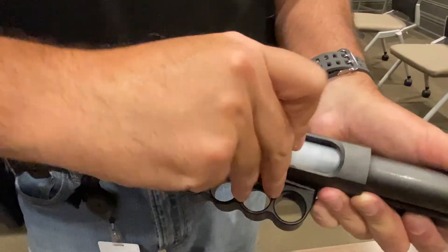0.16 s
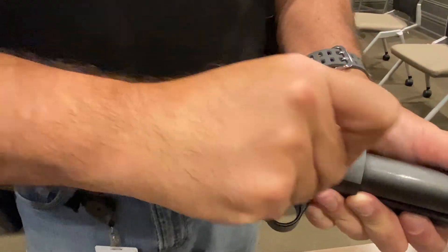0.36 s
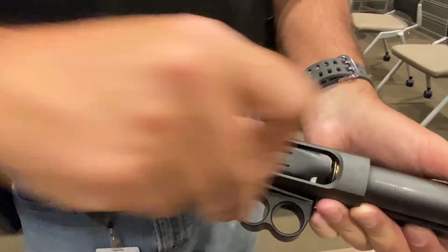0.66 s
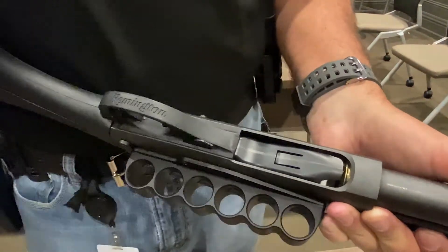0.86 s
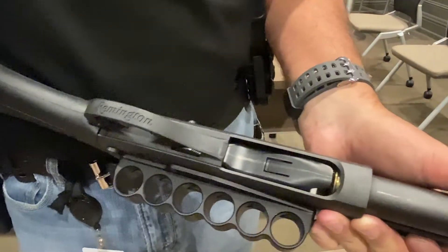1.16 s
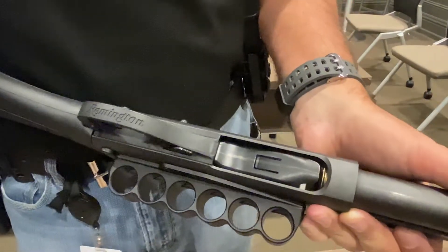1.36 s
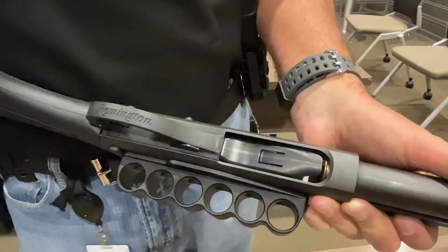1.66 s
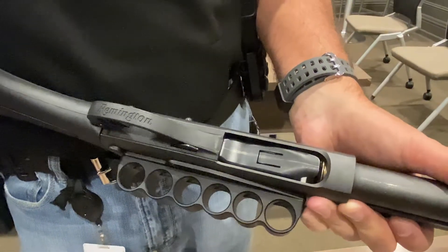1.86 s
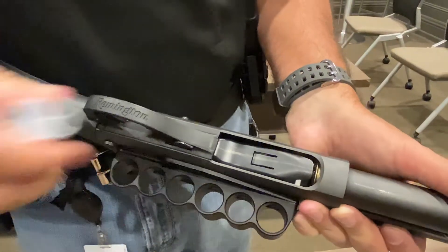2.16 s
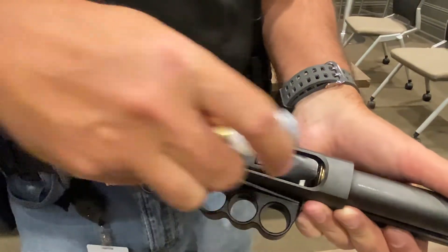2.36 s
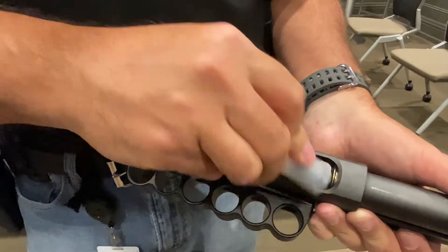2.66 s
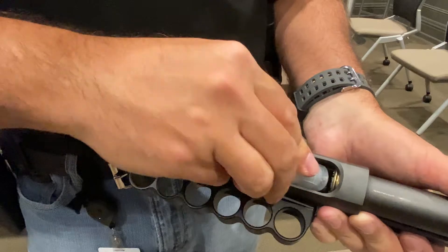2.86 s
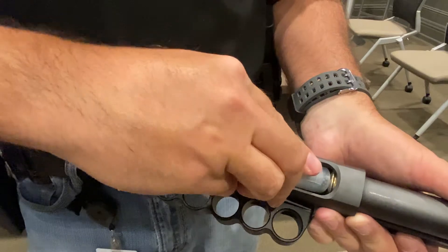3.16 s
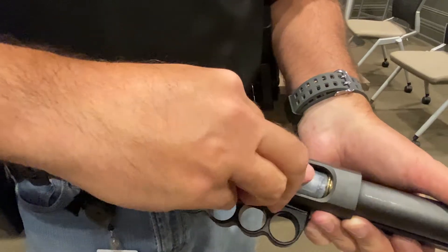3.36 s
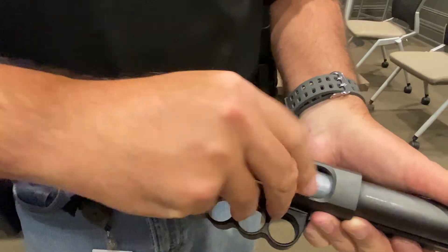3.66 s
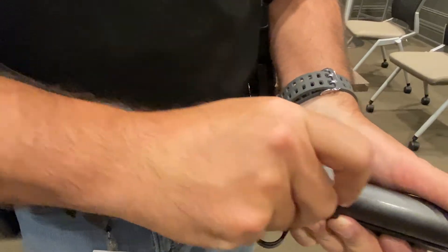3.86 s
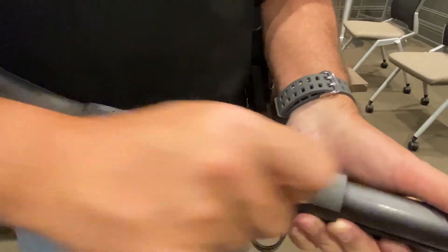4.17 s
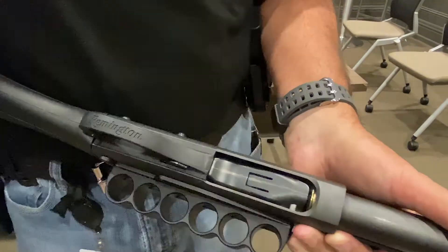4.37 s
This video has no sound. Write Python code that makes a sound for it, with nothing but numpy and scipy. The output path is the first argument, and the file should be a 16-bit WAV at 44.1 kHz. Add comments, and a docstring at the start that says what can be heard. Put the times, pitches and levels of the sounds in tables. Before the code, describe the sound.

Two plastic training shells are pushed into a pump shotgun with sharp metallic clicks, scrapes and snaps, close up in a classroom.

```python
"""Loading a pump shotgun

Two plastic training shells are thumbed into the magazine tube, close to the microphone.
Each slaps the lifter down, scrapes forward, trips the latch and snaps home; the lifter drops shut.
Each blow is a burst of chatter through the resonances of the struck part. Hands rub and knock
on the gun. A ventilated classroom throws every click back."""
import sys
import numpy as np
from scipy import signal
from scipy.fft import rfft, irfft, next_fast_len
from scipy.io import wavfile
from scipy.ndimage import uniform_filter1d, minimum_filter1d

SR = 44100
rng = np.random.default_rng(int(sys.argv[2]) if len(sys.argv) > 2 else 0)


def materialize(psi):
    """Save the field psi as 16-bit PCM at rate SR to the path in sys.argv[1].

    A 1-D psi becomes a single channel; in a 2-D psi each row is a channel.
    """
    bounded = np.clip(np.atleast_2d(psi).T, -1, 1)
    quanta = np.round(bounded * 32767).astype(np.int16)
    wavfile.write(sys.argv[1], SR, quanta)


N = 198846
LEAD = SR // 10  # samples before time zero
TOTAL = N + LEAD

# Background spectra: freq_hz, gain_db
VENT_COLOUR = [(15, -38.5), (25, -14), (110, -11), (145, -9.5), (235, -7), (325, -12), (362, -3.5),
               (393, -15), (515, -15), (772, -19.5), (1010, -19.5), (1600, -29), (2210, -29), (3060, -30),
               (15900, -35)]
HISS_COLOUR = [(18, -29), (30, 7), (59, -1.5), (292, -7), (379, -13.5), (432, -2.5), (852, -11.5),
               (11900, -8.5), (15500, -4.5)]
# Ventilation tones: pitch_hz, level_db
VENT_TONES = [(59, -70.5), (119, -64.5), (241, -66), (360.5, -60), (10056, -74.5), (15283, -75)]
# Room decay: freq_hz, t60_s
ROOM_DECAY = [(150, 0.23), (600, 0.44), (1700, 0.61), (4200, 0.68), (8000, 0.49), (14000, 0.41)]
# Room tail spectrum: freq_hz, gain_db
TAIL_COLOUR = [(150, 3), (600, 3), (1700, -1), (3300, -2), (4200, -4.5), (5600, -2), (8000, 0), (14000, -8)]
# Echoes off body, floor and walls: delay_s, gain_db
ROOM_ECHOES = [(.0058, -9.5), (0.0124, -11), (0.018, -20.5), (0.0383, -16), (0.049, -23), (0.0774, -20)]

# Hand strokes: start_s, length_s, level_db, hollow_share
HAND_RUBS = [(1.606, 0.062, -44, 0.92), (4.227, 0.024, -46.5, 0), (4.246, 0.047, -39, 0.11)]
# Shell pushes along lifter and tube: start_s, length_s, level_db, bright_share
SHELL_SCRAPES = [(.515, 0.065, -39, 0), (.595, 0.13, -36, 0.45), (0.803, .035, -33, 1),
                 (3.089, 0.06, -40, .1), (3.121, 0.071, -35.5, 0.2), (3.197, 0.03, -28.5, 0.68),
                 (3.238, 0.029, -34, 0.5)]

# Blows: start_s, level_db (over 10 ms), chatter_t60_s, tilt_db_per_oct, contact_hz, boost_db
HAND_KNOCKS = [(2.066, -43, 0.086, -6, 860, 6.2), (2.3457, -45.5, 0.1, 1, 2590, 6.4),
               (2.3791, -41.5, 0.036, 0.5, 2600, 6.5), (2.4684, -37.5, 0.11, 2.5, 510, 16),
               (3.770, -35, 0.035, -0.5, 800, 11.6), (4.348, -52, 0.041, -15, 454, 4)]
GUN_THUDS = [(3.479, -27.5, 0.052, 0.5, 335, 10.3), (3.546, -39, 0.051, -1, 270, 33)]
LIFTER_SHUTS = [(1.0270, -32, 0.039, 1.6, 3400, 4.3), (1.040, -38, 0.013, 0.5, 940, 7.5),
                (3.7583, -37.5, 0.0067, -2.9, 2630, 11)]
PORT_TAPS = [(-.02, -17.5, 0.071, 0.52, 6640, 3.4), (2.5537, -30, 0.014, 0.98, 2290, 6.8),
             (3.1134, -33.5, 0.018, 0.15, 6050, 10)]
LATCH_TRIPS = [(.5955, -24, 0.0098, 0.81, 11900, 5), (.6020, -35.5, 0.012, 0.075, 11700, 7.1),
               (3.1345, -24.5, 0.086, -0.44, 14200, 27.5)]
LIFTER_SLAPS = [(0.333, -12, 0.0056, 0.2, 9700, 5.5), (2.7424, -7.5, 0.0063, 0.3, 4020, 1.5)]
# Shell snaps home: blow columns, touch_lead_s
TUBE_SNAPS = [(0.7734, -18, .03, 0.82, 1375, 10.6, 0.001444), (3.2790, -18, 0.082, 0.5, 1350, 11.3, 0.0088),
              (3.4771, -19.5, 0.034, .43, 4300, 4.5, .0117)]
# Shell catches in the tube: start_s, level_db (over 10 ms), chatter_t60_s, tilt_db_per_oct
TUBE_CATCHES = [(.536, -41.5, .02, -1), (0.7274, -28, .025, 1), (.741, -28, 0.06, -0.5),
                (0.9586, -42.5, 0.057, -5.5), (3.5152, -26.5, 0.072, -1.2)]
# Light contacts around a blow: chatter_t60_s, tilt_db_per_oct, contact_hz, boost_db
SNAP_TOUCH = (0.04, -0.6, 3300, 8)
SLAP_TOUCH = (0.17, -0.8, 2603.5, 10)
REBOUND = (0.027, 0.51, 6500, 8.2)

# Broad spectra of rubbed and struck parts: freq_hz, gain_db
SKIN_COLOUR = [(120, -27.5), (200, -8), (450, -3.5), (600, 0), (750, -8), (1000, -0.5), (1200, -10),
               (1700, -14.5), (2600, -30), (3600, -23), (9000, -44)]
GRIT_COLOUR = [(200, -21), (600, -13.5), (1000, -11.5), (1700, -12.5), (2600, -6.5), (4000, 2), (5900, 6),
               (7000, 2.5), (9000, -2.5), (12500, 2), (16000, -12)]
HULL_COLOUR = [(500, 8), (2000, 10.5), (6000, -4.5), (9000, -11), (15000, -42)]
RECEIVER_COLOUR = [(100, -9), (250, -11.5), (500, -5.5), (900, 2.5), (1500, -4), (2600, -8), (4200, -9.5),
                   (7000, -21), (15000, -30)]
GUN_COLOUR = [(60, -36), (130, -14), (220, -3), (320, 2.5), (420, -8.5), (600, -14), (1000, -2.5),
              (2000, -6.5), (6000, -22.5)]
SHUT_COLOUR = [(88, -22), (150, -12), (588, -6.5), (757, -2.5), (1390, -6.5), (2050, 1), (2850, -8.5),
               (3470, -6.5), (4210, -7.5), (5430, -12.5), (15900, -35)]
PORT_COLOUR = [(88, -45.5), (150, -16), (340, -19.5), (493, -23), (743, -6), (1330, -14), (1820, -10),
               (3540, -4.5), (4130, -5.5), (4740, -5.5), (5540, -2), (15900, -26)]
TRIP_COLOUR = [(88, -53.5), (150, -44), (347, -5), (414, -16), (757, 2.5), (1210, -11), (1310, -0.5),
               (1790, -8.5), (5430, 1), (10100, -2.5), (11200, -3.5), (15900, -20.5)]
MAGAZINE_COLOUR = [(88, -46), (150, -6), (321, -12), (465, -3.5), (743, -7.5), (1060, -9.5), (1310, -7),
                   (1720, -2), (3540, 3), (4650, 4.5), (5760, 2), (12100, -8), (15900, -12)]
LIFTER_BOLT_COLOUR = [(88, -70), (150, -42), (414, -19), (503, -10), (903, -12), (1390, -11), (1970, -3),
                      (2590, -5.5), (2910, -7), (3820, 5), (4930, 0.5), (7720, -1), (15900, -19)]

# Part resonances (negative: notch): centre_hz, width_hz, height_db
HOLLOW_MODES = [(750, 38, 21.5)]
RECEIVER_MODES = [(324, 25, 14), (746, 20, 10), (1280, 140, 6), (2300, 720, 2.6)]
GUN_MODES = [(757, 110, 14.7)]
SHUT_MODES = [(840, 87, 2.3), (1910, 300, 3.7), (2150, 100, 7.2), (3390, 270, 6.9), (4040, 230, 7.6),
              (5530, 370, 6.9)]
PORT_MODES = [(1825, 126, 9), (2450, 340, 6), (4180, 310, 10), (5490, 160, 9), (6700, 64, 5),
              (8550, 170, 4.5), (9450, 240, 3), (15100, 600, 9.5), (4780, 310, -1.5)]
TRIP_MODES = [(780, 480, 6), (2450, 180, 10.5), (4280, 210, 12), (5550, 300, 8), (11100, 140, 15.5),
              (15350, 200, 16), (13200, 1200, -7.5), (10300, 760, -6)]
MAGAZINE_MODES = [(826, 320, 6.5), (1468, 14, 9), (2436, 53, 8), (2660, 46, 6.5), (3450, 86, 5),
                  (4043, 74, 6.5), (5360, 210, 6), (5850, 150, 6), (6470, 120, 4), (8130, 110, 4),
                  (9840, 100, 7), (11600, 200, 6), (13400, 360, 6), (1660, 180, -5), (4450, 180, 2.5)]
LIFTER_BOLT_MODES = [(850, 280, 5.5), (1910, 380, 3), (2863, 144, 12), (3250, 260, 5), (3790, 134, 2),
                     (4100, 160, 3.5), (4250, 260, 5.5), (4490, 94, 1), (5600, 100, 1), (7640, 190, 3),
                     (8200, 210, 4), (10700, 760, 9), (12850, 380, 8.5), (15400, 600, 9.5), (4950, 170, -3),
                     (11550, 340, -4), (14000, 800, 1.5)]


def amp(db):
    """dB to gain."""
    return 10 ** (np.asarray(db) / 20)


def unit(x):
    """Scale to rms 1."""
    return x / np.sqrt(np.mean(x ** 2) + 1e-20)


def read(points, hz):
    """Interpolate a table over log frequency."""
    freq_hz, value = np.transpose(points)
    return np.interp(np.log(hz + 1), np.log(freq_hz + 1), value)


def add(mix, start_s, sound):
    """Mix into a buffer that begins LEAD samples early."""
    part = mix[max(0, round(start_s * SR) + LEAD):][:len(sound)]
    part += sound[:len(part)]


def shaped(x, colour):
    """Zero-phase filter by a dB spectrum."""
    size = next_fast_len(len(x))
    gain = amp(read(colour, np.fft.rfftfreq(size, 1 / SR)))
    return irfft(rfft(x, size) * gain, size)[:len(x)]


def body(colour, modes, tilt_db_per_oct=0, size=4096):
    """Minimum-phase response of a part: broad colour plus resonances."""
    hz = abs(np.fft.fftfreq(size, 1 / SR))
    db = np.maximum(read(colour, hz), -60) + tilt_db_per_oct * np.log2(np.maximum(hz, 300) / 3000)
    for centre_hz, width_hz, height_db in modes:
        bell = 1 / (1 + (2 * (hz - centre_hz) / width_hz) ** 2)
        db += np.sign(height_db) * 10 * np.log10(1 + (amp(abs(height_db)) ** 2 - 1) * bell)
    log_spectrum = np.conj(signal.hilbert(np.log(amp(db))))
    return np.fft.ifft(np.exp(log_spectrum)).real[:size // 2]


def chatter(t60_s, rise_s=0.00035, size=8192, whitening_passes=6):
    """Contact force: a dying flurry of tiny collisions, flat in spectrum."""
    t = np.arange(size) / SR
    force = rng.standard_normal(size) * (1 - np.exp(-t / rise_s)) * amp(-60 * t / t60_s)
    for _ in range(whitening_passes):
        phase = np.angle(rfft(force))
        force = irfft(np.exp(1j * phase)) * (t < t60_s)
    return force


def blows(rows, colour, modes, contact_q=7.8, max_width_hz=330, level_window_s=0.01):
    """Chatter rings one part; the point of contact favours one pitch."""
    out = np.zeros(TOTAL)
    for start_s, level_db, t60_s, tilt_db_per_oct, contact_hz, boost_db in rows:
        contact = (contact_hz, min(contact_hz / contact_q, max_width_hz), boost_db)
        click = signal.fftconvolve(chatter(t60_s), body(colour, [*modes, contact], tilt_db_per_oct))
        click *= np.sqrt(SR * level_window_s) / np.linalg.norm(click)
        add(out, start_s, amp(level_db) * click)
    return out


def friction(size, slips_per_s, spread_db):
    """Random tiny slips of uneven strength."""
    strength = amp(spread_db * np.minimum(rng.exponential(1, size), 4))
    return strength * rng.standard_normal(size) * (rng.random(size) < slips_per_s / SR)


def stroke(length_s, attack_s, release_s, sag_db_per_s):
    """Sliding pressure: grip, ease, let go."""
    t = np.arange(0, length_s + release_s, 1 / SR)
    grip = np.minimum(t / attack_s, 1)
    release = np.clip(1 - (t - length_s) / release_s, 0, 1)
    return grip * amp(-sag_db_per_s * t) * release


def hiss(level_db=-63):
    """Microphone hiss and air that differ between the ears."""
    return amp(level_db) * unit(shaped(rng.standard_normal(N), HISS_COLOUR))


def ventilation(air_db=-50.5, waver_rad=0.56):
    """Steady rush of air, wavering hum, thin whine."""
    t = np.arange(N) / SR
    out = amp(air_db) * unit(shaped(rng.standard_normal(N), VENT_COLOUR))
    knots_s = np.linspace(0, t[-1], 40)
    for pitch_hz, level_db in VENT_TONES:
        drift = np.interp(t, knots_s, np.cumsum(rng.standard_normal(len(knots_s))))
        out += amp(level_db) * np.sqrt(2) * np.sin(2 * np.pi * pitch_hz * t + waver_rad * drift)
    return out


def room_response(tail_db=-1.5, build_s=0.0019, hold_s=0.012):
    """Distinct echoes over a diffuse tail that lasts longest near 4 kHz."""
    t = np.arange(SR) / SR
    reflections = rng.standard_normal(SR) * (1 - np.exp(-(t / build_s) ** 2))
    hz, frame_s, spectra = signal.stft(reflections, SR, nperseg=256)
    fade_db = -60 * np.maximum(frame_s - hold_s, 0) / read(ROOM_DECAY, hz)[:, None]
    tail = signal.istft(spectra * amp(fade_db), SR, nperseg=256)[1][:SR]
    response = amp(tail_db) * shaped(tail / np.linalg.norm(tail), TAIL_COLOUR)
    for delay_s, gain_db in ROOM_ECHOES:
        scatter = chatter(t60_s=0.0092)  # smear from furniture and clothes
        response[round(delay_s * SR):][:len(scatter)] += amp(gain_db) * scatter
    return response


def classroom(x, count=10):
    """Reflections shift as gun and hands move: crossfaded room responses."""
    place = np.linspace(0, count - 1, TOTAL)
    weights = (np.sqrt(np.maximum(1 - abs(place - k), 0)) for k in range(count))
    return sum(signal.fftconvolve(x * weight, room_response())[:TOTAL] for weight in weights)


def rubs():
    """Skin drags on the gun: dull rustle, hollow ring."""
    out = np.zeros(TOTAL)
    for start_s, length_s, level_db, hollow_share in HAND_RUBS:
        pressure = stroke(length_s, attack_s=0.0092, release_s=0.021, sag_db_per_s=73)
        slips = friction(len(pressure), slips_per_s=9000, spread_db=-2.0)
        ring = unit(signal.fftconvolve(slips, body(SKIN_COLOUR, HOLLOW_MODES))[:len(pressure)])
        rustle = unit(shaped(slips, SKIN_COLOUR))
        rub = hollow_share * ring + (1 - hollow_share) * rustle
        add(out, start_s, amp(level_db) * pressure * rub)
    return out


def knocks():
    """Fingers and shell knock on the receiver."""
    return blows(HAND_KNOCKS, RECEIVER_COLOUR, RECEIVER_MODES)


def thuds():
    """The thumb bottoms out; the whole gun thuds in the hand."""
    return blows(GUN_THUDS, GUN_COLOUR, GUN_MODES)


def scrapes():
    """The shell grates over steel: dull on its plastic hull, bright on its metal rim."""
    out = np.zeros(TOTAL)
    for start_s, length_s, level_db, bright_share in SHELL_SCRAPES:
        pressure = stroke(length_s, attack_s=0.003, release_s=0.0092, sag_db_per_s=70)
        slips = friction(len(pressure), slips_per_s=13000, spread_db=1.5)
        rim = unit(shaped(slips, GRIT_COLOUR))
        hull = unit(shaped(rim, HULL_COLOUR))
        scrape = bright_share * rim + (1 - bright_share) * hull
        add(out, start_s, amp(level_db) * pressure * scrape)
    return out


def shuts():
    """The lifter swings shut."""
    return blows(LIFTER_SHUTS, SHUT_COLOUR, SHUT_MODES)


def taps():
    """The rim taps the edge of the loading port."""
    return blows(PORT_TAPS, PORT_COLOUR, PORT_MODES)


def trips():
    """The rim trips the springy shell latch."""
    return blows(LATCH_TRIPS, TRIP_COLOUR, TRIP_MODES)


def snaps(touch_db=-27, catch_hz=2050, catch_boost_db=9.7):
    """The tube rings as the shell catches in it, touches the latch and snaps past."""
    hits = [row[:-1] for row in TUBE_SNAPS]
    touches = [(start_s - lead_s, touch_db, *SNAP_TOUCH) for start_s, *_, lead_s in TUBE_SNAPS]
    catches = [(*row, catch_hz, catch_boost_db) for row in TUBE_CATCHES]
    return blows(hits + touches + catches, MAGAZINE_COLOUR, MAGAZINE_MODES)


def slaps(touch_lead_s=0.0101, touch_db=-22, rebound_delay_s=0.0045, rebound_gain_db=-15.5):
    """The shell touches the lifter and slams it against the bolt; the lifter rebounds once."""
    touches = [(start_s - touch_lead_s, touch_db, *SLAP_TOUCH) for start_s, *_ in LIFTER_SLAPS]
    rebounds = [(start_s + rebound_delay_s, level_db + rebound_gain_db, *REBOUND)
                for start_s, level_db, *_ in LIFTER_SLAPS]
    return blows(LIFTER_SLAPS + touches + rebounds, LIFTER_BOLT_COLOUR, LIFTER_BOLT_MODES)


def scene():
    """Gun and room centred; only the hiss has width."""
    gun = slaps() + taps() + trips() + snaps() + shuts() + knocks() + thuds() + scrapes() + rubs()
    mid = (gun + classroom(gun))[LEAD:] + ventilation()
    side = hiss()
    return np.array([mid + side, mid - side])


def record(dry, limit_db=1, hold_s=0.022, recovery_db_per_s=190, smooth_samples=65, cutoff_hz=15850):
    """Look-ahead limiter ducks the hardest slaps and first echoes; tips clip; low-pass follows."""
    peak_db = 20 * np.log10(abs(dry).max(0) + 1e-9)
    over_db = np.maximum(peak_db - limit_db, 0)
    half_hold = round(hold_s * SR / 2)
    held_db = -minimum_filter1d(-over_db, 2 * half_hold + 1, origin=half_hold)
    recovery_db = np.arange(N) * recovery_db_per_s / SR
    gain_db = recovery_db - np.maximum.accumulate(held_db + recovery_db)
    gain_db = uniform_filter1d(minimum_filter1d(gain_db, smooth_samples), smooth_samples)
    limited = np.clip(dry * amp(gain_db), -1, 1)
    lowpass = signal.firwin(511, cutoff_hz, window=("kaiser", 9), fs=SR)
    return signal.oaconvolve(limited, lowpass[None], "same")


dry = scene()
out = record(dry)
materialize(out)
```